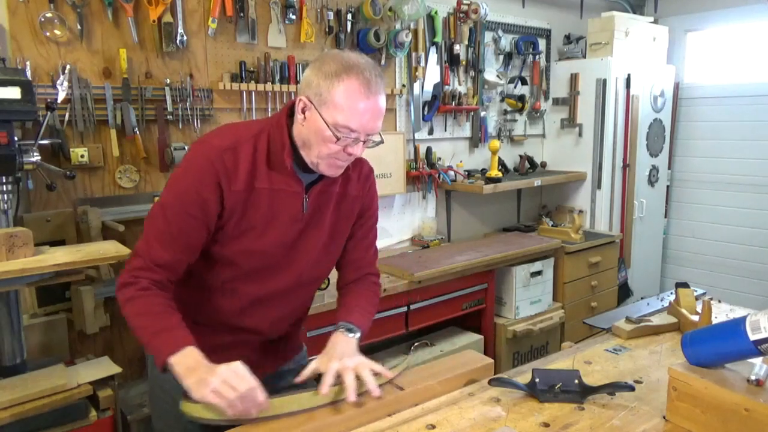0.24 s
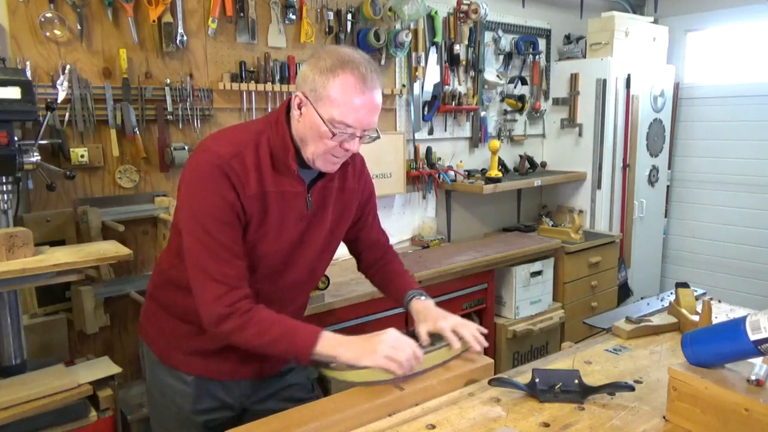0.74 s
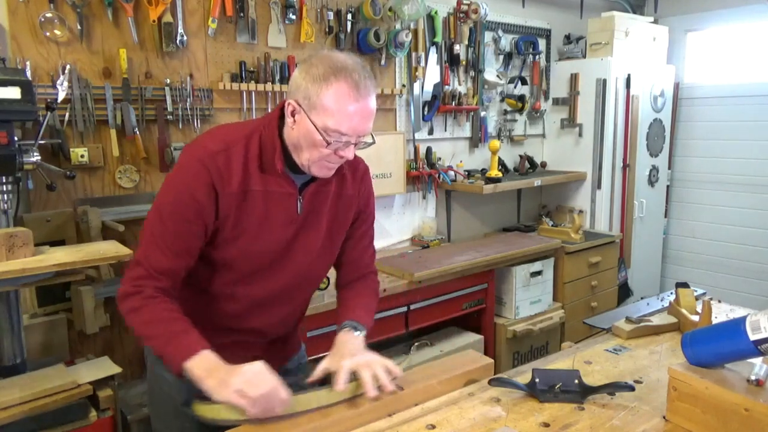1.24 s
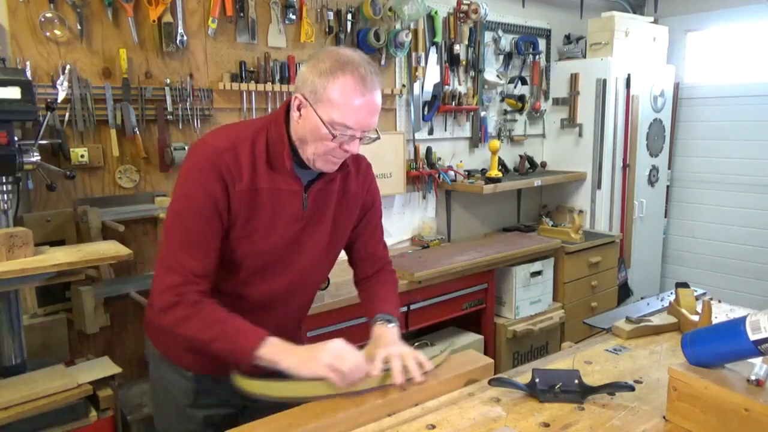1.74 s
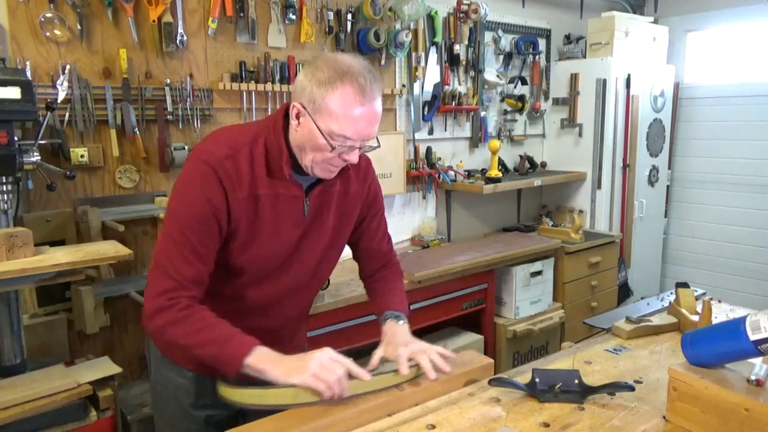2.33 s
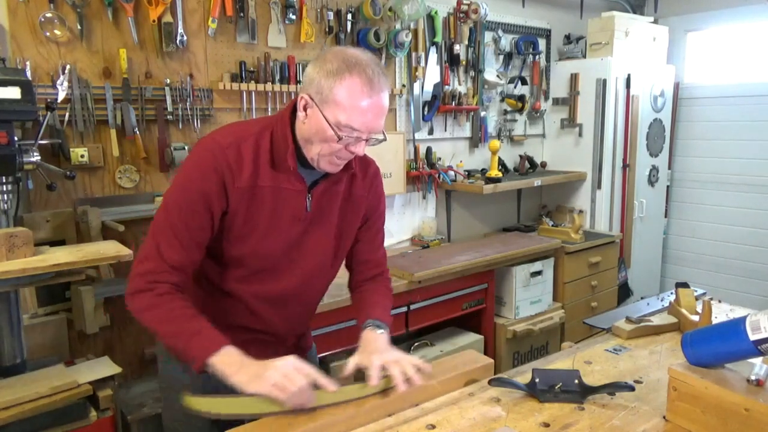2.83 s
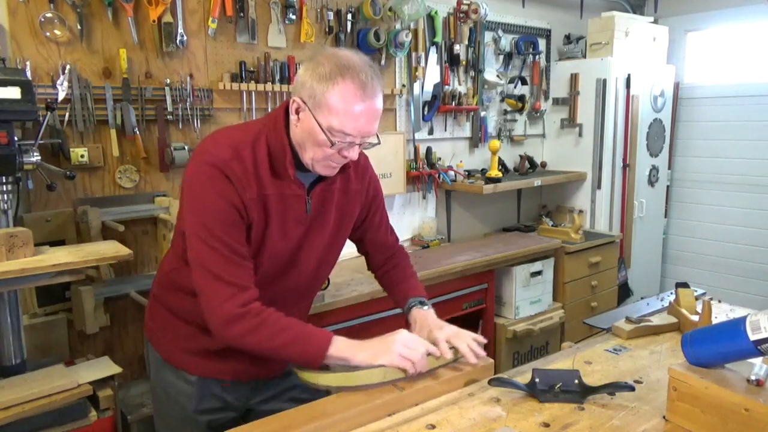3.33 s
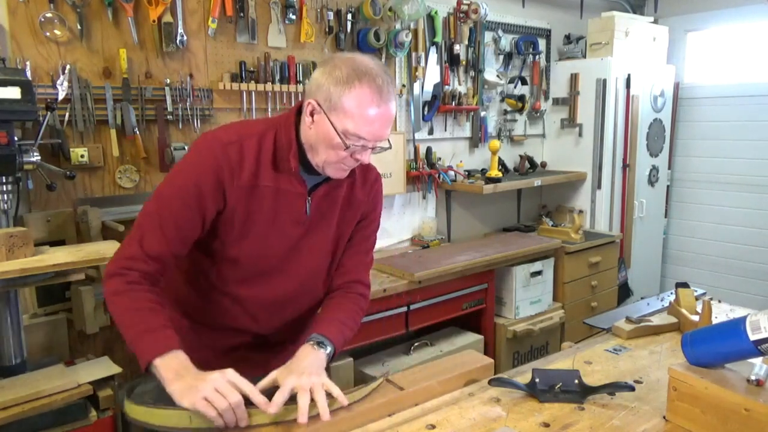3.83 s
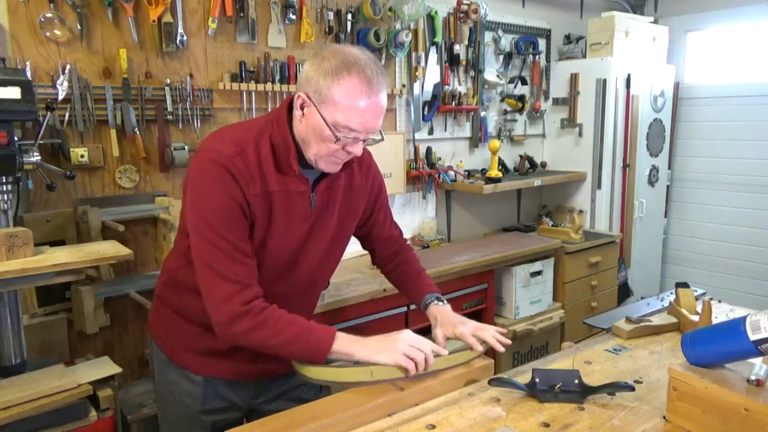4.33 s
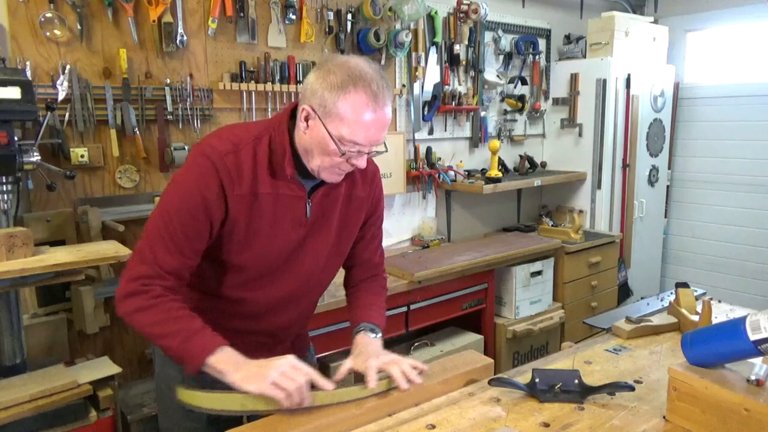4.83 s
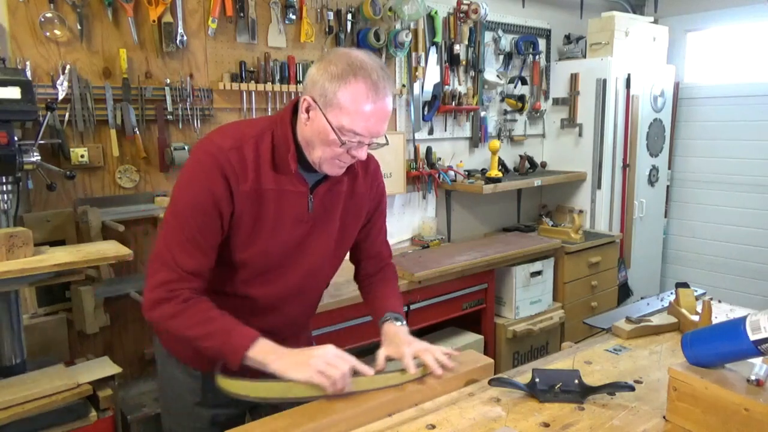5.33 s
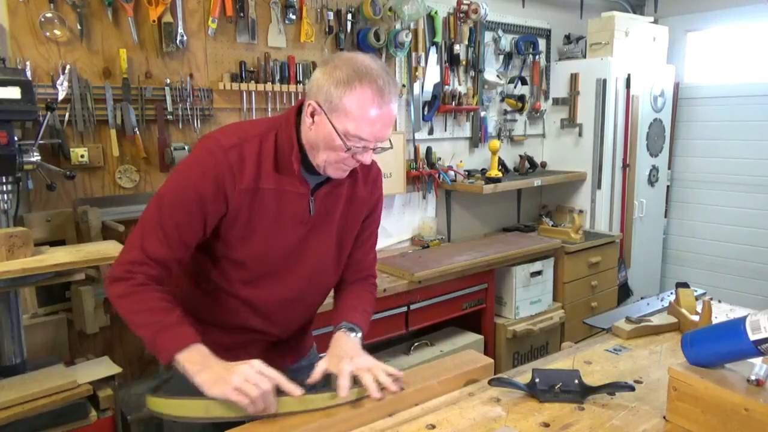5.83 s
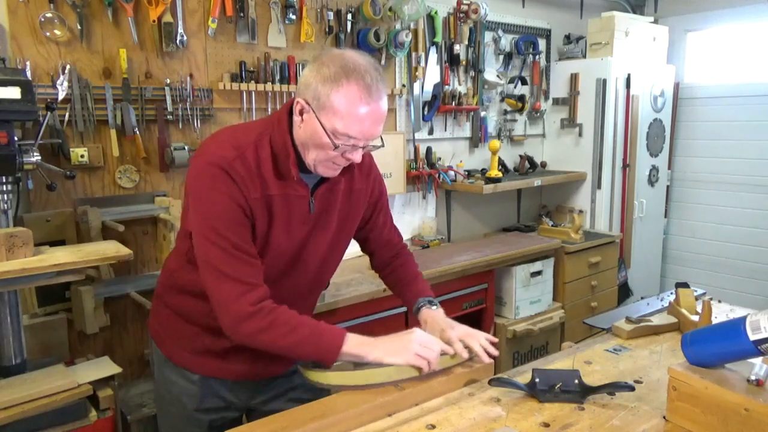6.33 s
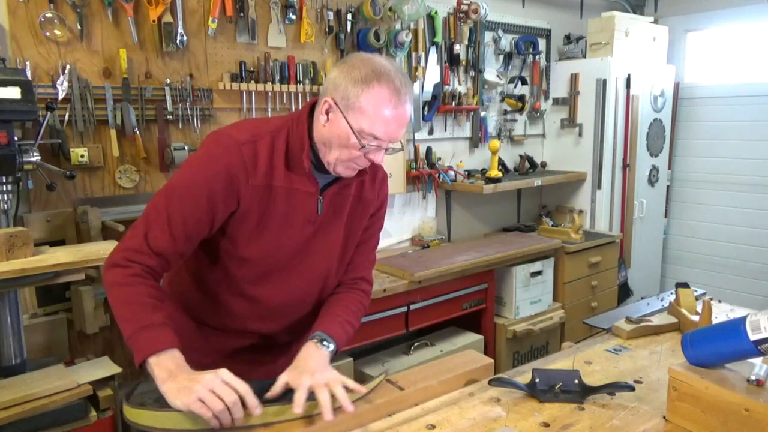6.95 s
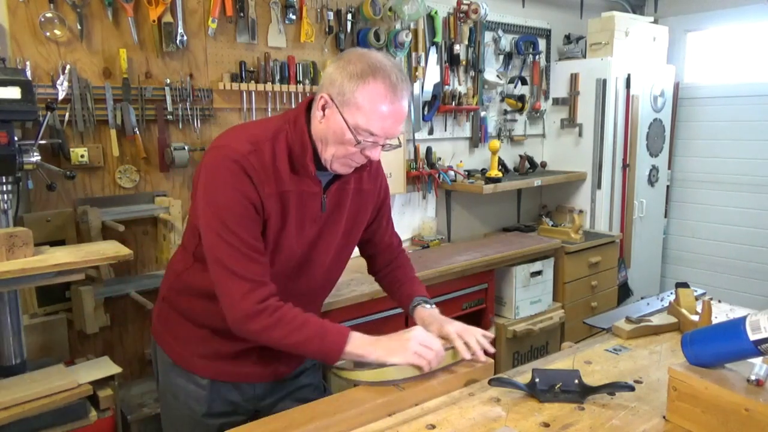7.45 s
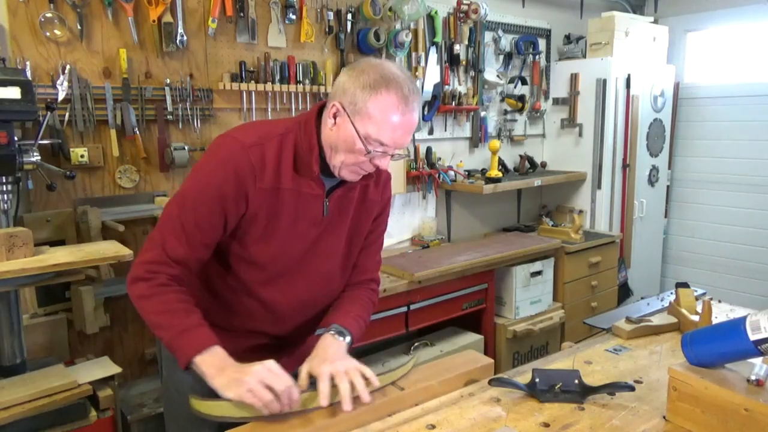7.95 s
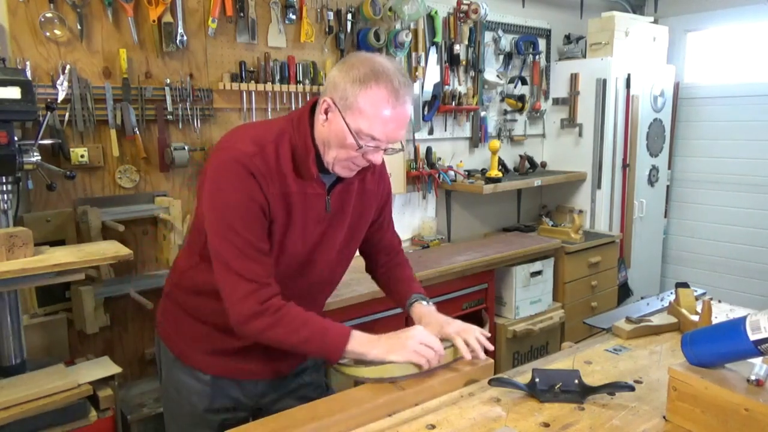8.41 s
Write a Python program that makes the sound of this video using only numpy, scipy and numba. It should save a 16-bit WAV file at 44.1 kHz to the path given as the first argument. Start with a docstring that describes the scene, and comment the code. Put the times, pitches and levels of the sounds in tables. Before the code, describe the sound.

In a small reverberant workshop, a thin wooden strip is shoved again and again over a hand plane's blade. Each push, about a third of a second, starts with a crisp spit of fibres and bright hiss, then digs into a louder, hollow woody rasp with gliding pitch. Between pushes the strip slides back and forth softly, with small catches, taps and dull bumps. Close stereo microphone, low rumble behind.

```python
"""A long thin strip of wood catches on the blade of a hand plane, then is pushed over it again and again. In
each push the edge bites with a spit of fibres; the iron rasps and the strip rings at a gliding pitch. Clean
cutting whistles; then the wood swells as the blade digs in, and the cut turns rough. Between pushes the strip
slides to and fro by friction, with short catches and taps; dull bumps come now and then. A faint hum sinks over
the first four seconds, above the steady rumble of a small reverberant workshop."""
import sys
import numpy as np
from scipy import signal
from scipy.fft import rfft, irfft, next_fast_len
from scipy.io import wavfile
from scipy.ndimage import uniform_filter1d, minimum_filter1d
from numba import njit

SR = 44100
rng = np.random.default_rng(int(sys.argv[2]) if len(sys.argv) > 2 else 0)


def transcribe(u):
    """Save the signal u as a 16-bit wav file named by the first command-line argument.

    u: samples, shape (n,) or (channels, n), limited to [-1, 1]; the rate is SR.
    q: integer samples, one column per channel.
    """
    v = np.clip(np.atleast_2d(u).T, -1, 1)
    q = np.round(v * 32767).astype(np.int16)
    wavfile.write(sys.argv[1], SR, q)


N = 382728
TIME = np.arange(N) / SR
SIZE = next_fast_len(N + SR)   # room for a one-second tail
FREQS = np.maximum(np.fft.rfftfreq(SIZE, 1 / SR), 1)

# All source levels below are relative: each source adds its own mixing levels.
# Cutting pushes. Each row: start in seconds, length in seconds, delay of digging in in seconds, delay of
# roughening in seconds, light wood in dB, dug-in wood in dB, bite rasp in dB, rough rasp in dB,
# clean hiss in dB, rough hiss in dB, bite pitch in Hz, deep pitch in Hz, exit pitch in Hz.
CUTTING_PUSHES = [ (0.123, 0.23, 0.12, 0.094, -27.5, -12.5, -27, -14.5, -17, -16, 2490, 1550, 650),
                  (1.073, 0.3, 0.084, 0.17, -13.5, -15, -13, -15, -11.5, -16, 1650, 894, 1830),
                  (2.19, 0.33, 0.061, 0.16, -21, -13.5, -22, -14.5, -19, -18, 927, 1036, 1600),
                  (3.418, 0.31, 0.021, 0.15, -27, -12.5, -12.5, -15, -11.5, -19, 1540, 1080, 1070),
                  (4.452, 0.32, 0.079, 0.21, -23.5, -15.5, -28, -25, -22, -30.5, 976, 620, 1740),
                  (6.404, .38, 0.052, 0.22, -23.5, -13.5, -12, -14, -19, -21.5, 1070, 1090, 1600),
                  (7.8, 0.25, .15, .14, -13.5, -11.5, -13.5, -15, -9, -19, 2070, 1150, 800),
                  (8.588, 0.27, .15, .2, -14.5, 0, -11.5, -15, -11.5, -17, 1770, 1000, 1000), ]
# The strip slides to and fro, nearly at rest at each turn. Each row: turn in seconds, wood in dB,
# fibre hiss in dB, pitch at full speed in Hz.
SLIDING_STROKES = [(-0.1, -29.5, -27, 1370), (0.45, -30, -25, 1180), (0.949, -32.5, -23.5, 1180),
                   (1.554, -33, -25, 1200), (2.09, -29.5, -23.5, 1140), (2.705, -33.5, -26.5, 1200),
                   (3.29, -23.5, -23, 1300), (3.92, -35.5, -28, 1390), (4.4, -34, -23, 1170),
                   (5.11, -37.5, -31, 1110), (5.5, -32, -26.5, 1106), (5.839, -30, -23.5, 1440),
                   (6.319, -26.5, -23.5, 1110), (6.94, -42, -27.5, 895), (7.172, -37, -31.5, 1700),
                   (7.64, -48, -28.5, 1030), (8.11, -29.5, -25, 1710), (8.5, -24.5, -20.5, 1350)]
# The hand presses harder while sliding. Each row: middle in seconds, half length in seconds, wood in dB,
# fibre hiss in dB, pitch in Hz.
FIRM_RUBS = [(0.486, .022, -23.5, -40, 860), (0.771, 0.037, -18, -17, 1645),
             (1.736, 0.0098, -22, -28, 1130), (1.879, 0.041, -21, -18.5, 1130),
             (1.963, 0.031, -24, -24, 870), (2.51, 0.02, -12, -36, 930), (2.966, 0.069, -25.5, -20, 1700),
             (3.118, 0.029, -21, -17, 1150), (4.03, 0.038, -30.5, -33, 1800),
             (4.285, 0.042, -24.5, -24, 850), (4.416, 0.092, -35, -44, 620),
             (4.893, 0.036, -28.5, -43, 890), (5.362, 0.087, -30.5, -25.5, 1150),
             (5.657, 0.018, -34, -28.5, 950), (6.006, 0.028, -19.5, -20.5, 1680),
             (6.14, 0.055, -32.5, -42, 1090), (7.37, 0.13, -31.5, -29.5, 2050),
             (7.229, 0.029, -26.5, -27.5, 870), (7.469, 0.016, -23, -26, 1930),
             (7.573, 0.032, -30.5, -50, 470), (7.76, 0.033, -28.5, -26, 660),
             (8.31, 0.048, -26.5, -17.5, 2380), (8.362, 0.01, -19, -20, 1830)]
# The strip catches briefly on the blade. Each row: start in seconds, length in seconds, wood in dB,
# iron rasp in dB, hiss in dB.
BLADE_CATCHES = [(0.0, 0.014, -16, -27, -10.5), (0.086, 0.022, -17.5, -21, -9),
                 (2.158, 0.024, -26.5, -26, -21.5), (2.889, 0.037, -22.5, -27, -27),
                 (3.104, 0.017, -24.5, -24.5, -24), (4.039, 0.025, -26.5, -40, -24.5),
                 (4.918, 0.014, -13.5, -15, -18), (4.94, 0.019, -24, -22, -21),
                 (5.317, 0.02, -32.5, -33, -25), (5.682, 0.039, -14.5, -11, -17),
                 (5.72, 0.056, -45, -26.5, -30), (5.98, 0.028, -29, -26, -33),
                 (6.188, 0.039, -26.5, -28, -23), (7.441, 0.033, -22, -30, -12.5),
                 (7.496, 0.022, -36, -46, -27.5), (8.237, 0.142, -34, -32.5, -26)]
# The strip taps the sole. Each row: start in seconds, level in dB.
SOLE_TAPS = [(0.493, -7.5), (1.797, -14), (2.724, -16), (6.006, -23), (7.224, -27), (7.773, -17)]
# The strip bumps dully. Each row: start in seconds, length in seconds, level in dB.
STRIP_BUMPS = [(0.357, 0.027, -24), (4.664, 0.035, -35), (8.003, 0.078, -29.5)]
# Narrow modes of the strip. Each row: centre in Hz, width in Hz, height over the broad response in dB.
NARROW_STRIP_MODES = [(632, 17.6, 8), (745, 5.5, 5), (767.5, 8.6, 6), (845, 4.7, 1.5), (935, 5.3, -3.5),
                      (1005, 48, 5), (1112, 18, 5.5), (1278, 24, -5.5), (1670, 20, -1.5), (1676, 60, 2),
                      (1900, 5.7, 4.5), (2030, 45, 0), (2306, 25, 4.5), (2430, 26, 9), (2856, 27, 5.5)]
# Broad response of the strip. Each row: frequency in Hz, level in dB per Hz.
WOOD_RESPONSE = [(90, -44), (250, -25), (420, -18), (600, -8), (800, -3), (1030, 0), (1300, -2.5),
                 (1700, 1.5), (2300, -5), (3200, -11), (5500, -28)]
# Broad response of the rasping iron. Each row: frequency in Hz, level in dB per Hz.
IRON_RESPONSE = [(1500, -20), (2500, -7), (3200, -4.5), (3900, -1.5), (4150, 4), (4320, 4.5), (4700, -3),
                 (5100, -6.5), (6200, -8), (11000, -15)]
# The iron's own ring. Each row: frequency in Hz, level in dB per Hz.
IRON_RING_RESPONSE = [(3000, -24), (3950, -13), (4240, 0), (4500, -10), (5200, -24)]
# Broad response of the tearing fibres. Each row: frequency in Hz, level in dB per Hz.
FIBRE_RESPONSE = [(2500, -20), (4800, -10), (5450, -6), (5750, -1), (6150, .5), (6900, -1.5), (7600, 0),
                  (8200, -3.5), (9600, -3.5), (10300, -.5), (11000, -2)]
# Dull body of a bump. Each row: frequency in Hz, level in dB per Hz.
BUMP_RESPONSE = [(70, -34), (140, -9), (240, -0.5), (380, 5), (900, -18)]
# Decay of the workshop. Each row: frequency in Hz, time to fall by 60 dB in seconds.
WORKSHOP_DECAY = [(200, 0.49), (1000, 0.45), (4000, 0.46), (10000, 0.15)]
# Stereo spread of diffuse sound. Each row: frequency in Hz, side against mid in dB.
DIFFUSE_WIDTH = [(30, -13), (150, 1), (350, -1), (700, -11.5), (2000, -14.5), (11000, -6)]
# The sinking hum. Each row: time in seconds, pitch in Hz, mean level in dB.
SINKING_HUM = [(0, 95.7, -41), (0.5, 89.4, -50), (1.1, 85.6, -49), (2.0, 74, -62), (4.0, 55.3, -63)]
# Colour of the room's rumble. Each row: frequency in Hz, relative level in dB.
RUMBLE_COLOUR = [(20, -10), (45, -8), (70, -13), (105, 3.5), (160, -9), (260, -1.5), (500, 6), (1000, 3),
                 (3000, -4.5), (11000, -8.5)]
# Balance of the microphone pair. Each row: frequency in Hz, left minus right in dB.
MICROPHONE_BALANCE = [(30, 3), (80, 9), (180, 9.5), (330, 20.5), (600, 5), (1300, 2), (2600, 1.2),
                      (11000, -0.9)]

DIG_IN_S, ROUGHEN_S = 0.0088, 0.026   # how gradually the cut changes
BITE_DECAY_S, CLEAN_RASP_DB = 0.078, -31.5   # the first rasp dies down to that of a clean cut
WOOD_SAG_DB_PER_S, HISS_ARCH_DB = 2, 1   # the wood eases after digging in; the hiss arches at mid-push
PITCH_HOLD_SHARE, PITCH_DEEP_SHARE = 0.34, 0.716   # shares of a push: bite pitch ends, deep pitch is reached
BITE_HISS_DB, BITE_HISS_S = 4.5, 0.0097   # a spit of fibres as the edge enters
PUSH_ATTACK_S, PUSH_RELEASE_S = 0.004, 0.018
LAST_STROKE_S, REST_HZ = 0.43, 486   # length of the final stroke; the strip's pitch at rest
WOOD_SPEED_POWER, HISS_SPEED_POWER, PITCH_SPEED_POWER = 0.83, 0.58, 0.54   # growth with sliding speed
RADIATION_CUT_HZ = 67   # so small a source gives off little bass
CUTOFF_HZ = 11050   # upper limit of the microphone signal


def pushes(whistle, wood_db=-3.5, clean_wood_db=-6.5, bend_db=-3.0, iron_db=-2.0, fibre_db=1.0,
           whistle_db=-4.0, whistle_growth=0.54):
    """Forced excitation by cutting: a clean cut whistles, a dug-in one shakes the strip, a rough one rasps."""
    force = friction(per_s=4500, spread_db=-2.0, grain_db=1.0, grain_rate=240, smooth=1.0)
    wood, iron, fibres = excite(force, flutter_db=3.5)
    (t, length, dig, rough, light_wood, deep_wood, bite_rasp, rough_rasp,
     clean_hiss, rough_hiss, bite_hz, deep_hz, exit_hz) = under_way(CUTTING_PUSHES)
    age = np.maximum(t, 0)
    progress = np.clip(t / length, 0, 1)

    wood_level = ease(light_wood, deep_wood, t - dig, DIG_IN_S)
    wood_level -= WOOD_SAG_DB_PER_S * np.maximum(t - dig, 0)
    first_rasp = from_db(bite_rasp) * np.exp(-age / BITE_DECAY_S)
    later_rasp = from_db(ease(CLEAN_RASP_DB, rough_rasp, t - rough, ROUGHEN_S))
    iron_level = 20 * np.log10(np.hypot(first_rasp, later_rasp))
    hiss_level = ease(clean_hiss, rough_hiss, t - rough, ROUGHEN_S)
    hiss_level += HISS_ARCH_DB * (np.sin(np.pi * progress) - 0.5)
    hiss_level += BITE_HISS_DB * np.exp(-age / BITE_HISS_S)

    to_deep = np.interp(progress, [PITCH_HOLD_SHARE, PITCH_DEEP_SHARE], [0, 1])
    to_exit = np.interp(progress, [PITCH_DEEP_SHARE, 1], [0, 1])
    pitch = bite_hz * (deep_hz / bite_hz) ** to_deep * (exit_hz / deep_hz) ** to_exit
    slips = friction(per_s=1500, spread_db=2.0, grain_db=0.7, grain_rate=120, smooth=0.29)
    broad_db = ease(clean_wood_db, wood_db, t - dig, DIG_IN_S)   # digging in shakes the whole strip
    strip = from_db(broad_db) * wood + from_db(bend_db) * bending(slips, pitch)

    torn_fibre_level = hiss_level + 0.19 * (iron_level - hiss_level)   # a rough cut tears more fibres
    cleanness_db = np.minimum(hiss_level - 20 * np.log10(later_rasp) + 0.5, 6)
    sound = from_db(wood_level) * strip
    sound += from_db(iron_level + iron_db) * iron
    sound += from_db(torn_fibre_level + fibre_db) * fibres
    sound += from_db(hiss_level + whistle_growth * cleanness_db + whistle_db) * whistle
    release = np.exp(-np.clip((t - length) / PUSH_RELEASE_S, 0, 20))
    return sound * np.minimum(age / PUSH_ATTACK_S, 1) * release


def shaving(centre_hz=6950, edge_db=-8.5):
    """Noise-driven resonance: the thin shaving whistles unsteadily over a steadier ring of the edge."""
    whistle_hz = centre_hz * np.exp(0.045 * drift(70))
    whistle = sing(rng.standard_normal(N), whistle_hz, relative_width=0.15)
    edge = sing(rng.standard_normal(N), np.full(N, 7560.0), relative_width=0.045)
    return (whistle + from_db(edge_db) * edge) * from_db(1.4 * drift(70))


def slides(whistle, wood_level, hiss_level, pitch, wood_db=-6.0, bend_db=-6.5, iron_db=-14.5,
           iron_waver_db=3.5, rasp_db=-7.5, rasp_growth=0.94, fibre_db=1.0, whistle_db=-6.5,
           whistle_growth=1.0):
    """Sliding friction on the sole: the iron rings faintly; rasp and whistle fade fastest in light rubs."""
    force = friction(per_s=2500, spread_db=1.5, grain_db=1.5, grain_rate=170, smooth=0.84)
    wood, iron, fibres = excite(force, flutter_db=1.5)
    ring = rms_one(colour(scatter(force), at_hz(IRON_RING_RESPONSE)))
    ring_level = (wood_level + hiss_level) / 2 + iron_db + iron_waver_db * drift(8.2)
    rasp_level = wood_level + rasp_growth * np.minimum(wood_level + 18.5, 0) + rasp_db
    whistle_level = hiss_level + whistle_growth * np.minimum(hiss_level + 18.5, 3) + whistle_db
    strip = from_db(wood_db) * wood + from_db(bend_db) * bending(rng.standard_normal(N), pitch)
    sound = from_db(wood_level) * strip
    sound += from_db(ring_level) * ring
    sound += from_db(rasp_level) * iron
    sound += from_db(hiss_level + fibre_db) * fibres
    return sound + from_db(whistle_level) * whistle


def sliding_motion():
    """Speed and pressure govern friction: wood dB, hiss dB and pitch in Hz from the strokes and firm rubs."""
    _, wood_db, hiss_db, top_hz = under_way(SLIDING_STROKES)
    turns = [row[0] for row in SLIDING_STROKES]
    turns.append(turns[-1] + LAST_STROKE_S)
    stroke_count = np.interp(TIME, turns, np.arange(len(turns)))
    speed = np.maximum(np.abs(np.sin(np.pi * stroke_count)), 0.01)   # 1 at full speed
    wood_power = (from_db(wood_db) * speed ** WOOD_SPEED_POWER) ** 2
    hiss_power = (from_db(hiss_db) * speed ** HISS_SPEED_POWER) ** 2
    stroke_hz = REST_HZ * (top_hz / REST_HZ) ** (speed ** PITCH_SPEED_POWER)
    weighted_pitch = wood_power * np.log(stroke_hz)   # the stronger contact sets the pitch
    for middle, half_length, rub_wood_db, rub_hiss_db, rub_hz in FIRM_RUBS:
        press = np.exp(-np.minimum(((TIME - middle) / half_length) ** 2, 20))
        rub_power = from_db(rub_wood_db) ** 2 * press
        wood_power = wood_power + rub_power
        hiss_power = hiss_power + from_db(rub_hiss_db) ** 2 * press
        weighted_pitch = weighted_pitch + rub_power * np.log(rub_hz)
    return 10 * np.log10(wood_power), 10 * np.log10(hiss_power), np.exp(weighted_pitch / wood_power)


def catches(bite, whistle, pitch, wood_db=-2.5, bend_db=-6.0, fibre_db=-1.0, whistle_db=-7.5):
    """Brief forced excitation: short rough bites of the blade sound strip, iron and fibres together."""
    wood, iron, fibres = bite
    strip = from_db(wood_db) * wood + from_db(bend_db) * bending(rng.standard_normal(N), pitch)
    hiss = from_db(fibre_db) * fibres + from_db(whistle_db) * whistle
    parts = np.array([strip, iron, hiss])
    sound = np.zeros(N)
    for start, length, *levels in BLADE_CATCHES:
        touch = contact(start, start + length, attack=0.0028, release=0.004)
        sound += touch * (from_db(levels) @ parts)
    return sound


def taps(bite, level_db=-11.0, iron_db=-1.0, fibre_db=0.0):
    """Impulsive excitation: light knocks that die within milliseconds."""
    wood, iron, fibres = bite
    knocks = np.zeros(N)
    for start, db in SOLE_TAPS:
        knocks += from_db(db + level_db) * contact(start, start + 0.002, attack=0.001, release=0.004)
    return knocks * (wood + from_db(iron_db) * iron + from_db(fibre_db) * fibres)


def bumps():
    """Structure-borne sound: dull thuds of the strip, carried by plane and bench."""
    body = rms_one(colour(rng.standard_normal(N), at_hz(BUMP_RESPONSE)))
    thuds = np.zeros(N)
    for start, length, db in STRIP_BUMPS:
        thuds += from_db(db) * contact(start, start + length, attack=0.0041, release=0.036)
    return body * thuds


def friction(per_s, spread_db, grain_db, grain_rate, smooth):
    """Random impulses over noise: fibres snap over a smooth rub, and the wood's grain bunches them."""
    sizes = from_db(spread_db * np.minimum(rng.exponential(1, N), 4)) * rng.choice([-1, 1], N)
    snaps = rms_one(sizes * (rng.random(N) < per_s / SR))
    rub = smooth * rng.standard_normal(N)
    return rms_one((snaps + rub) * from_db(grain_db * drift(grain_rate)))


def scatter(force):
    """Incoherence: the same force with a random sign at every sample."""
    return force * rng.choice([-1, 1], N)


def excite(force, flutter_db):
    """Common excitation: one force sounds the strip, iron and fibres, each with its own flutter."""
    responses = at_hz(WOOD_RESPONSE) + narrow_modes(), at_hz(IRON_RESPONSE), at_hz(FIBRE_RESPONSE)
    sounds = []
    for response in responses:
        sound = rms_one(colour(scatter(force), response))
        sounds.append(sound * from_db(flutter_db * drift(55)))
    return sounds


def narrow_modes():
    """Modal resonance: the strip's narrow modes, in dB over its broad response."""
    return sum(db / (1 + (2 * (FREQS - hz) / width) ** 2) for hz, width, db in NARROW_STRIP_MODES)


def bending(force, hz, relative_width=0.29, wobble=0.091, upper_ratio=1.713, upper_db=-9.0):
    """Bending resonance gliding with the free length between fingers and blade, and a weaker one above."""
    bend_hz = hz * np.exp(wobble * drift(60))
    drive = colour(force, narrow_modes())
    lower = sing(drive, bend_hz, relative_width)
    upper = sing(drive, upper_ratio * bend_hz, relative_width)
    return lower + from_db(upper_db) * upper


def sing(force, hz, relative_width):
    """Cascaded resonance: the same moving pole pair applied twice, for steep skirts and an even level."""
    width = np.abs(relative_width) * hz
    once = moving_resonance(force, hz, width, SR) * np.sqrt(hz)
    return rms_one(moving_resonance(once, hz, width, SR))


@njit
def moving_resonance(x, hz, width_hz, sr):
    """Damped oscillation: a two-pole resonance whose centre moves."""
    out, state = np.zeros(len(x)), 0j
    for i in range(len(x)):
        r = np.exp(-np.pi * width_hz[i] / sr)
        state = state * r * np.exp(2j * np.pi * hz[i] / sr) + x[i] * np.sqrt(1 - r * r)
        out[i] = state.real
    return out


def contact(start, end, attack, release):
    """Contact envelope: a linear rise at the first touch, an exponential decay after the last."""
    rise = np.clip((TIME - start) / attack, 0, 1)
    return rise * np.exp(-np.clip((TIME - end) / release, 0, 20))


def under_way(events):
    """Succession: time since the latest event began, and its other columns, at every moment."""
    rows = np.array(events)
    latest = np.maximum(np.searchsorted(rows[:, 0], TIME, "right") - 1, 0)
    start, *columns = rows[latest].T
    return [TIME - start, *columns]


def ease(before, after, since, duration):
    """Smooth transition from one value to another, half done when `since` is zero."""
    return before + (after - before) * (1 + np.tanh(since / duration)) / 2


def drift(rate):
    """Random modulation of rms 1, with about `rate` new values a second joined by straight lines."""
    knots = rng.standard_normal(N // 8)
    return rms_one(np.interp(TIME * rate, np.arange(len(knots)), knots))


def from_db(db):
    """Logarithmic level: decibels to amplitude gain."""
    return 10 ** (np.asarray(db) / 20)


def rms_one(x):
    """Normalization: scale to rms 1."""
    return x / np.sqrt(np.mean(x ** 2) + 1e-20)


def at_hz(points, hz=FREQS):
    """Spectral interpolation: read a table on a log-frequency axis."""
    known_hz, values = np.transpose(points)
    return np.interp(np.log(hz), np.log(known_hz), values)


def colour(x, gain_db):
    """Linear filtering: a gain in dB for each frequency."""
    return irfft(rfft(x, SIZE) * from_db(gain_db), SIZE)[..., :N]


def workshop(x, wet_db=-8.0, first_echo=0.0036):
    """Reverberation: bench and cluttered walls scatter sound into a dense tail; the treble dies first."""
    noise, tail = rfft(diffuse()[:, :SR]), 0
    hz, t = np.maximum(np.arange(noise.shape[1]), 1), TIME[:SR]
    centres, t60s = np.transpose(WORKSHOP_DECAY)
    for weights, t60 in zip(np.eye(len(centres)), t60s):
        band = irfft(noise * np.interp(np.log(hz), np.log(centres), weights), SR)
        tail = tail + band * np.exp(-np.log(1000) * t / t60) * (t > first_echo)
    tail = tail / np.sqrt(np.sum(tail ** 2) / 2)
    return from_db(wet_db) * irfft(rfft(x, SIZE) * rfft(tail, SIZE), SIZE)[:, :N]


def diffuse():
    """Diffuse field: stereo noise as two close microphones hear it from all around."""
    mid, side = rng.standard_normal((2, N))
    return mid + colour(side, at_hz(DIFFUSE_WIDTH)) * [[1], [-1]]


def background(rumble_db=-36.0):
    """Tone over ambient noise: a wavering hum sinks like a machine running down, over diffuse rumble."""
    s, hz, db = np.transpose(SINKING_HUM)
    level = np.interp(TIME, s, db) + 2.6 * drift(10.3)
    phase = 2 * np.pi * np.cumsum(np.interp(TIME, s, hz)) / SR
    hum = from_db(level) * np.sin(phase)
    rumble = rms_one(colour(diffuse(), at_hz(RUMBLE_COLOUR)))
    return hum + from_db(rumble_db) * rumble


def scene():
    """Superposition: the work at the bench, its reverberation and the background."""
    whistle = shaving()
    bite_force = friction(per_s=3500, spread_db=-2.0, grain_db=0.0, grain_rate=140, smooth=0.92)
    bite = excite(bite_force, flutter_db=6.0)
    wood_level, hiss_level, pitch = sliding_motion()
    work = pushes(whistle) + slides(whistle, wood_level, hiss_level, pitch)
    work += catches(bite, whistle, pitch) + taps(bite) + bumps()
    bass_cut = signal.butter(2, RADIATION_CUT_HZ, "high", fs=SR, output="sos")
    work = signal.sosfilt(bass_cut, work)
    return work + workshop(work) + background()


def record(dry, ceiling=1.0):
    """Reception: the right microphone is thin in the bass; a fast limiter holds peaks, then treble is cut."""
    balance = from_db(at_hz(MICROPHONE_BALANCE))
    port_gains = 2 * np.array([balance, np.ones_like(balance)]) / (1 + balance)
    ports = colour(dry, 20 * np.log10(port_gains))
    peaks = np.abs(ports).max(axis=0)
    allowed = 1 / np.maximum(peaks / min(ceiling, 0.88), 1)
    gain = uniform_filter1d(minimum_filter1d(allowed, size=161), size=161)   # windows in samples
    treble_cut = signal.ellip(12, 0.1, 90, CUTOFF_HZ, fs=SR, output="sos")
    return signal.sosfilt(treble_cut, ports * gain)


dry = scene()
out = record(dry)
transcribe(out)
```